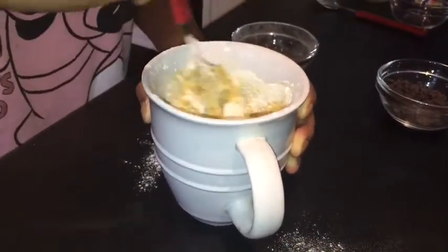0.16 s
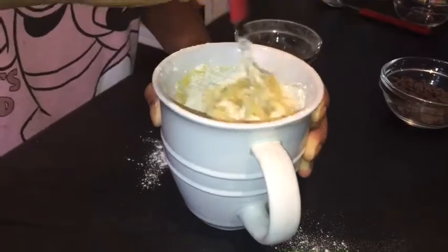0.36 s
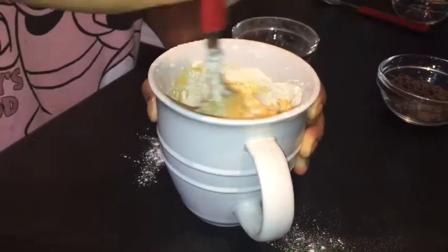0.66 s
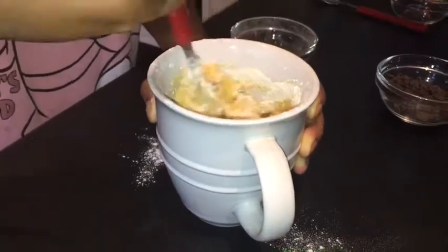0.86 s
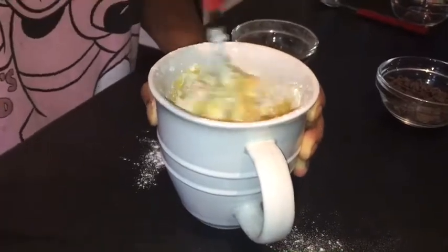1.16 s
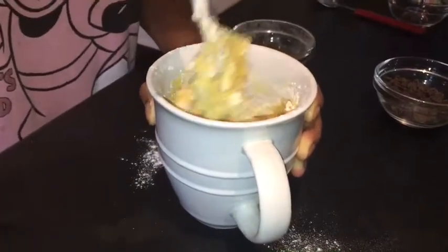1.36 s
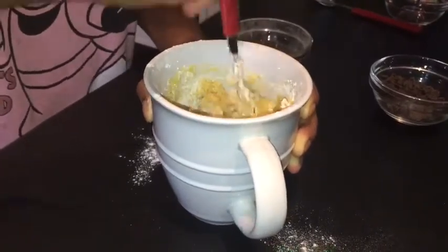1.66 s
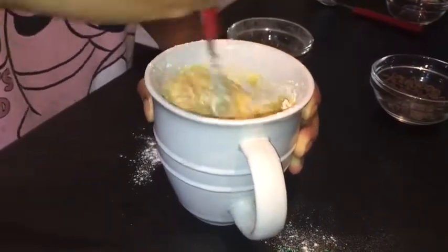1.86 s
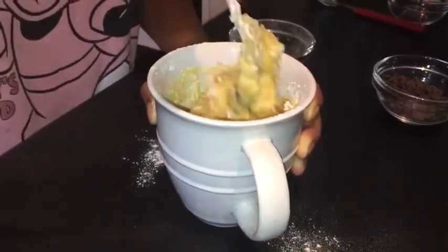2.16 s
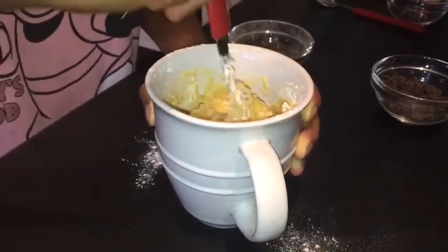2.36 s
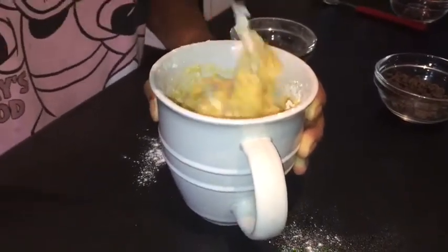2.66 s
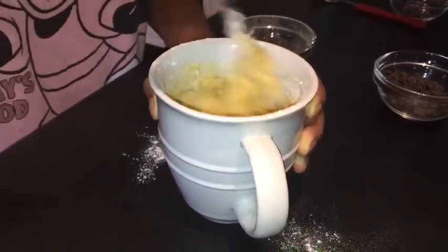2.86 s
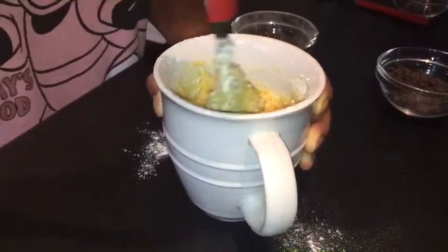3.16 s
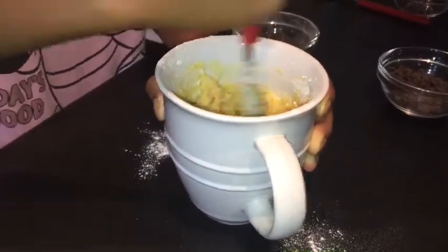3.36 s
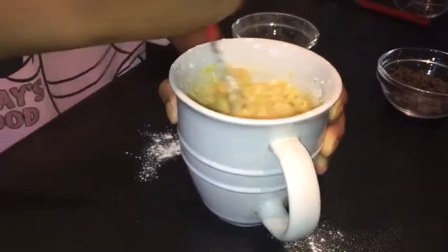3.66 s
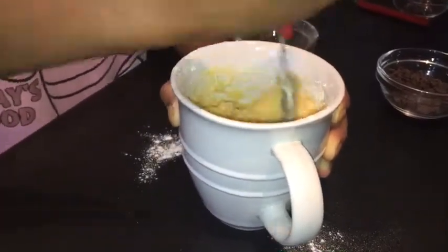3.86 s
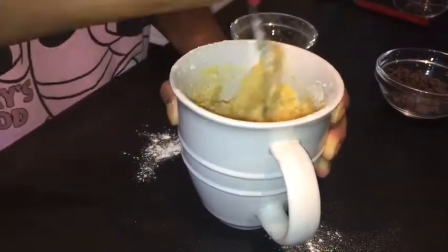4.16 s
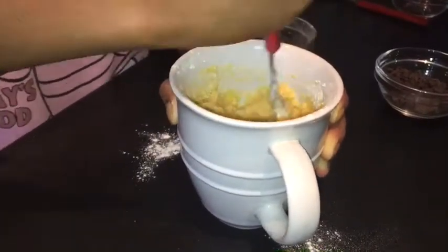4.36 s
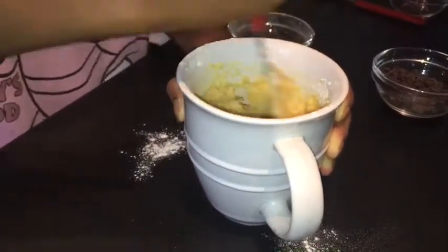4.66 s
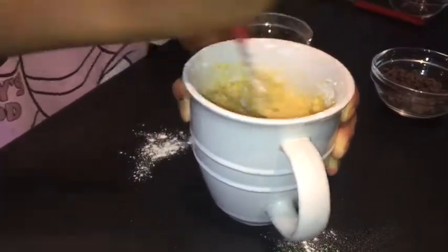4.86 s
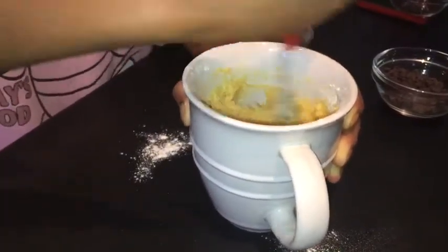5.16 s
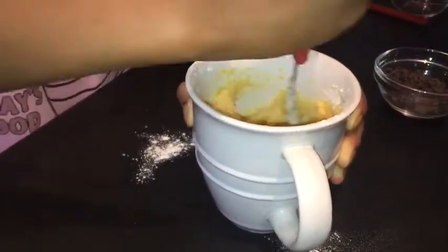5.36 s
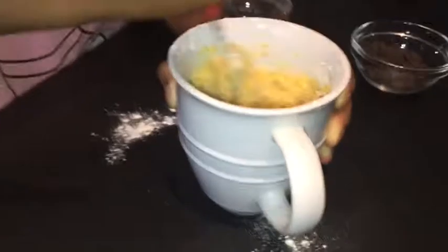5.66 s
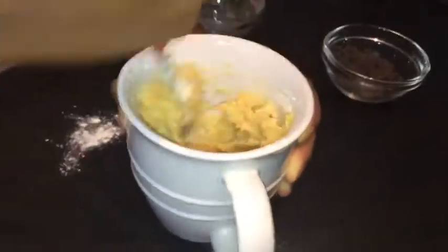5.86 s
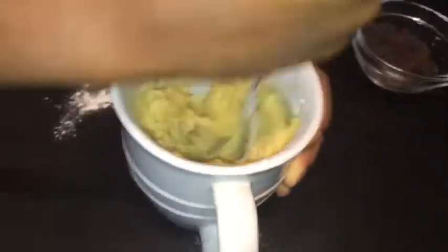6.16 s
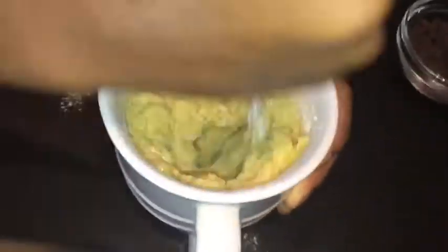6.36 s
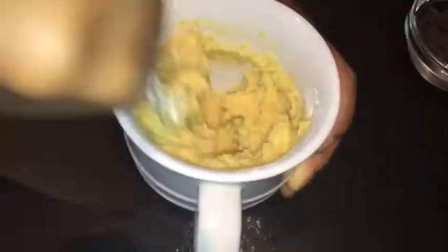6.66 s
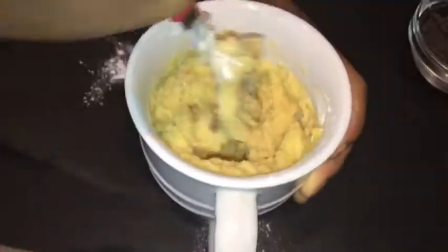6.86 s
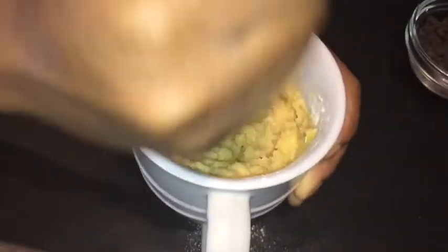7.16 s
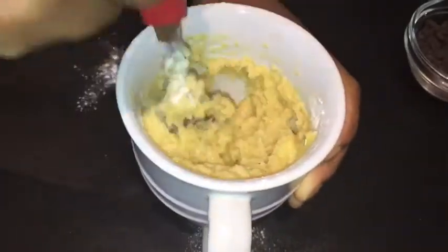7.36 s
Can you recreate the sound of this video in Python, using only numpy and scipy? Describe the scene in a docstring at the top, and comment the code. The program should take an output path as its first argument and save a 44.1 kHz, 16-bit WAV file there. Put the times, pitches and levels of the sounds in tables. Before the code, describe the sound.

Close up in a quiet kitchen, thick dough is mixed in a ceramic mug with a metal spoon. Faint crumbly scrapes and scattered muffled taps come first, then sharper clinks and steadier rubbing along the wall as the mixing gets busier and louder. The mug now and then thumps softly on the counter. The last strokes drop back to light scrapes and ticks.

```python
"""A spoon knocks in a hand-held ceramic mug as it stirs stiff, sticky dough on a kitchen counter.
Each impact excites damped modes of the dough-lined wall, the base, the spoon and the counter.
Stick-slip friction rasps crumbs along the glaze, sticky threads snap, and each push shakes the counter.
A small hard room reverberates the impacts, over a quiet noise floor and a faint passing hum."""
import sys
import numpy as np
from scipy import signal
from scipy.fft import rfft, irfft
from scipy.io import wavfile
from scipy.ndimage import uniform_filter1d

SR = 44100
rng = np.random.default_rng(int(sys.argv[2]) if len(sys.argv) > 2 else 0)


def put_to_file(sound):
    """Save the sound as 16-bit audio at rate SR, in the file named by the first command-line argument."""
    columns = np.atleast_2d(sound).T  # one column per channel
    safe = np.clip(columns, -1, 1)
    whole_steps = np.round(safe * 32767)
    wavfile.write(sys.argv[1], SR, whole_steps.astype(np.int16))


N = 331058
TIME = np.arange(N) / SR


def amp(db):
    return 10 ** (np.asarray(db) / 20)


def unit_rms(x):
    return x / np.sqrt(np.mean(x ** 2) + 1e-20)


def unit_peak_rms(x, window_s):
    return x / np.sqrt(uniform_filter1d(x ** 2, max(round(window_s * SR), 1)).max())


def curve_at(points, hz):
    f, value = np.transpose(points)
    return np.interp(np.log(hz + 1), np.log(f + 1), value)


def add(mix, start_s, sound):
    part = mix[round(start_s * SR):][:len(sound)]
    part += sound[:len(part)]


def colour(x, spectrum):
    """Spectral shaping by a curve in dB, at unit rms."""
    return unit_rms(irfft(rfft(x) * amp(curve_at(spectrum, np.fft.rfftfreq(len(x), 1 / SR))), len(x)))


def band(x, low_hz, high_hz, order=2):
    """Band-pass filtering, at unit rms."""
    return unit_rms(signal.sosfilt(signal.butter(order, [low_hz, high_hz], "band", fs=SR, output="sos"), x))


def flutter(rate_hz):
    """Random modulation: low-passed noise of unit rms."""
    return unit_rms(signal.lfilter(*signal.butter(2, rate_hz, fs=SR), rng.standard_normal(N)))


def resonate(x, hz, width_hz):
    """Resonance of movable frequency by heterodyning: shift down, smooth, shift back."""
    carrier = np.exp(2j * np.pi * np.cumsum(hz * np.ones(len(x))) / SR)
    pole = np.exp(-np.pi * width_hz / SR)
    return 2 * (carrier * signal.lfilter([1 - pole], [1, -pole], x / carrier)).real


def ring(modes, rise_s, chance, scale=1, rough=0, detune=0.018):
    """Modal superposition: damped sines of alternating sign, varied in level and tuning by each blow."""
    t = np.arange(SR // 4) / SR
    out = np.zeros(len(t))
    for k, ((hz, db, t60), draw) in enumerate(zip(modes, chance)):
        envelope = amp(db + 3.7 * draw - 60 * t / t60)
        out += (-1) ** k * envelope * np.sin(2 * np.pi * hz * scale * (1 + detune * draw) * t)
    out = out * (1 - np.exp(-t / rise_s)) * (1 + rough)
    return unit_peak_rms(out, 3 / (modes[0][0] * scale))


# Noise floor spectrum: f/Hz, relative level/dB
AIR_SPECTRUM = [(50, -24), (114, 2), (294, -13), (423, -13.5), (942, -20.5), (5000, -26.5), (9900, -30.5),
                (12500, -27.5), (16600, -18.5)]
def still_air(level_db=-63.5):
    """Stationary broadband noise, strongest in the bass."""
    return amp(level_db) * colour(rng.standard_normal(N), AIR_SPECTRUM)


# Passing hum: start t/s, end t/s, f/Hz, level/dB
HUM_TONE = (1.66, 3.5, 198, -63.5)
def hum():
    """Amplitude modulation: a faint low tone wavers in level."""
    start, end, hz, db = HUM_TONE
    gate = np.clip(20 * np.minimum(TIME - start, end - TIME), 0, 1)
    return amp(db + 2 * flutter(3.4)) * gate * np.sin(2 * np.pi * hz * TIME)


# Room reverberation: f/Hz, T60/s, level/dB
ROOM_BANDS = [(300, .3, -7), (900, .28, -7), (2000, .2, -15), (6000, .15, -17), (14000, .1, -21)]
def reverberation(x):
    """Sparse reflections decay exponentially; absorption by soft surfaces shortens the treble."""
    taps = np.zeros(SR // 2)
    slots = np.arange(60, SR // 2 - 20, 20)
    taps[slots + rng.integers(0, 20, len(slots))] = rng.choice([-1., 1.], len(slots))
    hz, t, spectra = signal.stft(taps, SR, nperseg=256)
    t60 = curve_at([row[:2] for row in ROOM_BANDS], hz)[:, None]
    gain = amp(curve_at([row[::2] for row in ROOM_BANDS], hz))[:, None]
    decay = amp(-60 * t / t60)
    decay *= gain / np.linalg.norm(decay, axis=1)[:, None]
    tail = signal.istft(spectra * decay, SR, nperseg=256)[1] * np.sqrt(20 / 128)
    return signal.oaconvolve(x, tail)[:N]


# The mug rocks against the counter: t/s, level/dB, f/Hz
MUG_BUMPS = [(0.009, -41, 100), (0.118, -56, 177), (0.06, -57, 112), (0.285, -51, 309), (0.812, -55.5, 167),
             (1.066, -54.5, 300), (1.74, -46, 216), (1.985, -48, 73.5), (2.008, -60, 123),
             (3.006, -38, 166), (5.127, -27.5, 157), (5.327, -45.5, 238), (2.546, -48.5, 282),
             (3.343, -42, 300), (3.561, -47, 282), (3.882, -54, 288), (7.359, -43, 166)]
def bumps():
    """A soft, slow contact excites only low modes: the counter's boom and one overtone."""
    out = np.zeros(N)
    for (start, db, hz), chance in zip(MUG_BUMPS, rng.standard_normal((len(MUG_BUMPS), 2))):
        overtone_db = 6 - 20 * max(np.log2(hz / 180), 0)
        modes = [(1.0, 10.3, 0.13), (2.05, overtone_db, 0.034)]
        add(out, start, amp(db) * ring(modes, 0.00046, chance, scale=hz))
    return out


# Strength of the shaking: t/s, level/dB
PUSH_LEVELS = [(0.0, -55.5), (1.54, -64.5), (1.71, -62), (2.92, -54.5), (3.13, -60.5), (3.7, -54.5),
               (4.22, -68), (4.7, -58), (4.99, -47), (5.28, -50), (5.41, -51.5), (5.64, -55), (5.8, -50),
               (6.54, -54), (6.92, -65), (7.5, -57.5)]
# Resonances of the shaken counter: f/Hz, bandwidth/Hz, relative level/dB
SHAKE_MODES = [(130, 20, -46), (176, 44, 7.5), (303, 30, 14.5), (391, 15, 0.5)]
def counter_shake(drag_db, follow=0.65):
    """Forced vibration: uneven pushes drive the counter's resonances, harder on each stroke."""
    shove_db = np.clip(drag_db - uniform_filter1d(drag_db, size=SR // 2), -15, 15)
    level_db = np.interp(TIME, *np.transpose(PUSH_LEVELS)) + follow * shove_db
    force = rng.standard_normal(N) * amp(3.35 * flutter(5.3) + 2 * stick_slip(8.2, 0.01))
    t = np.arange(SR // 8) / SR
    response = sum(amp(db) * np.sqrt(width) * np.exp(-np.pi * width * t) * np.sin(2 * np.pi * hz * t)
                   for hz, width, db in SHAKE_MODES)
    return amp(level_db) * unit_rms(signal.oaconvolve(force, response)[:N])


# Small ticks, from sticky dough snaps and a few light spoon taps on the mug wall: t/s, level/dB, f/Hz
SMALL_TICKS = [(0.2915, -48.5, 8500), (0.4433, -47.5, 8550), (0.642, -44.5, 4570), (0.96, -52, 3100),
               (0.851, -45.5, 4100), (1.065, -49, 8100), (1.076, -39.5, 11200), (1.282, -52.5, 2900),
               (1.7309, -37.5, 5100), (1.8, -45, 12400), (2.064, -44, 12100), (2.4233, -40, 7400),
               (2.429, -36, 7200), (2.4785, -43, 11900), (2.755, -40, 12600), (3.0422, -38.5, 8700),
               (3.0725, -50, 4500), (3.314, -42.5, 7900), (3.433, -42, 3970), (3.462, -42.5, 4000),
               (3.476, -46.5, 3900), (3.495, -53, 3800), (3.628, -44.5, 3180), (3.6564, -43, 4700),
               (4.5174, -48, 4000), (4.82, -38.5, 3770), (4.865, -36.5, 3770), (5.4556, -39, 2120),
               (5.871, -38, 2240), (6.2657, -40.5, 2120), (6.32, -43, 2350), (5.949, -40, 11600),
               (6.196, -46, 9450), (6.394, -41, 9000), (6.575, -26.5, 13000), (6.767, -31, 12000),
               (7.3286, -45, 2730), (7.416, -38.5, 12300)]
def ticks(decay_cycles=2.1):
    """Damped transients of tone and hiss around one pitch; at constant Q, low ones last longer."""
    out, t = np.zeros(N), np.arange(256) / SR
    for start, db, hz in SMALL_TICKS:
        hiss = band(rng.standard_normal(len(t)), hz / 1.5, min(hz * 1.5, 15000), order=1)
        tick = (np.sin(2 * np.pi * hz * t) + 0.77 * hiss) * t * np.exp(-t * hz / decay_cycles)
        add(out, start, amp(db) * unit_peak_rms(tick, 0.0018))
    return out


def stick_slip(per_s, relax_s):
    """Relaxation process: sudden random jumps that ease off, with zero mean and unit rms."""
    jumps = rng.exponential(1, N) * (rng.random(N) < per_s / SR)
    tension = np.log(0.19 + signal.lfilter([1], [1, -np.exp(-1 / SR / relax_s)], jumps))
    return unit_rms(tension - tension.mean())


def crackle(per_s, spread_db, low_hz, high_hz, cycles):
    """Poisson process of damped pops at twelve pitches, most faint, a few strong."""
    impulses = amp(spread_db * np.minimum(rng.exponential(1, N), 3)) * (rng.random(N) < per_s / SR)
    pitch_index = rng.integers(0, 12, N)
    out, t = np.zeros(N), np.arange(256) / SR
    for k, hz in enumerate(np.geomspace(low_hz, high_hz, 12)):
        pop = np.sin(2 * np.pi * hz * t) * t * np.exp(-t * hz / cycles)
        out += signal.oaconvolve(impulses * (pitch_index == k), pop / np.linalg.norm(pop))[:N]
    return unit_rms(out)


def lumps(x, depth_db):
    """Spectral modulation by lumps of dough: random patches some 1500 Hz wide and 25 ms long."""
    spectra = signal.stft(x, nperseg=256, noverlap=192)[2]
    patches = rng.standard_normal(spectra.shape[::-1]).T
    patches = unit_rms(uniform_filter1d(uniform_filter1d(patches, size=9, axis=0), size=18, axis=1))
    return signal.istft(spectra * amp(depth_db * patches), nperseg=256, noverlap=192)[1][:N]


# Crumbs on the glaze: f/Hz, relative level/dB
RASP_SPECTRUM = [(1800, -35), (3000, -2.5), (5300, -8), (8300, -2), (9900, -10), (12300, 2), (14500, -3.5),
                 (16500, -18)]
def crumb_rasp(jerk, graininess):
    """Friction noise: many tiny contacts make hiss and separate pops."""
    hiss = lumps(rng.standard_normal(N) * amp(4.95 * graininess * jerk), depth_db=3)
    pops = crackle(550, 8.1, 5000, 19000, cycles=0.55)
    return colour(hiss + 1.1 * graininess ** 2 * pops, RASP_SPECTRUM)


# Spoon sliding on the wall: f/Hz, relative level/dB
DRAG_SPECTRUM = [(260, -4.5), (700, -4.5), (1100, 0), (2070, -6), (2500, -7.5), (3200, -6), (4500, -11),
                 (6000, -36.5)]
def wall_drag(jerk, graininess):
    """Sliding friction excites a wandering resonance, so the wall sings faintly."""
    rub = lumps(rng.standard_normal(N) * amp(1.64 * graininess * jerk + 3.6 * np.tanh(flutter(21))), 4)
    rub += 0.14 * graininess * crackle(370, 7, 1700, 5000, cycles=2.4)
    singing = resonate(rub, hz=2043 * (1 + 0.022 * flutter(5.5)), width_hz=67)
    return colour(rub + amp(11) * singing, DRAG_SPECTRUM)


# Strokes through the dough: start t/s, duration/s, rasp level/dB, drag level/dB
STIR_STROKES = [(0.048, 0.41, -61.5, -67), (0.215, 0.034, -74, -52), (0.617, 0.19, -61, -72),
                (0.836, 0.0045, -50.5, -63), (0.913, 0.074, -67, -72), (1.058, 0.26, -60.5, -71),
                (1.46, 0.18, -63, -70.5), (1.712, 0.074, -54.5, -65), (1.846, 0.11, -65, -72.5),
                (2.01, 0.048, -57.5, -64), (2.116, 0.12, -70.5, -80.5), (2.249, 0.053, -63, -70.5),
                (2.382, 0.13, -57.5, -66.5), (2.536, 0.13, -59.5, -65.5), (2.709, 0.047, -57.5, -69),
                (2.824, 0.0085, -49.5, -62), (2.902, 0.24, -58.5, -68.5), (3.322, 0.032, -52, -52.5),
                (3.405, 0.073, -48, -60), (3.538, 0.14, -53.5, -54.5), (3.726, 0.11, -64.5, -65.5),
                (3.862, 0.035, -50.5, -61), (4.141, 0.027, -49.5, -63), (4.292, 0.03, -52, -56),
                (4.388, 0.094, -57.5, -60.5), (4.53, 0.87, -53.5, -56.5), (4.726, 0.35, -48.5, -49.5),
                (5.114, 0.011, -43.5, -49), (5.21, 0.009, -38, -45.5), (5.308, 0.0057, -43, -48.5),
                (5.393, .36, -48.5, -49.5), (5.8, 0.0087, -36.5, -46.5), (5.892, 0.13, -48, -49.5),
                (5.996, 0.076, -40, -51), (6.104, 0.13, -41, -53), (6.234, 0.28, -44.5, -51.5),
                (6.528, 0.06, -42.5, -57.5), (6.648, 0.0075, -39.5, -50), (6.746, 0.02, -39.5, -51.5),
                (7.01, 0.19, -61.5, -65.5), (7.3, 0.077, -50.5, -60), (7.413, 0.1, -57, -69)]
def stirring(rise_db_per_s=595, sag_db_per_s=13, fall_db_per_s=336.5):
    """Each stroke bites, tires and lets go; overlapping strokes are incoherent and add in power."""
    t = np.arange(0, N, 64) / SR
    start, length, *levels = np.transpose(STIR_STROKES)[:, :, None]
    age = t - start
    shape_db = (rise_db_per_s * np.minimum(age, 0) - sag_db_per_s * np.clip(age, 0, length)
                - fall_db_per_s * np.maximum(age - length, 0))
    powers = [(amp(db + shape_db) ** 2).sum(0) + 1e-12 for db in levels]
    rasp_db, drag_db = [np.interp(TIME, t, 10 * np.log10(power)) for power in powers]
    jerk = stick_slip(per_s=45, relax_s=0.0072)
    graininess = np.clip(-(rasp_db + 32.5) / 22, 0.5, 1.1)  # slow strokes part single threads
    rasp = amp(rasp_db) * crumb_rasp(jerk, graininess)
    drag = amp(drag_db) * wall_drag(jerk, graininess)
    return rasp + drag + counter_shake(drag_db)


# Modes of the spoon's bowl, edge and stem, each: f/Hz, relative level/dB, T60/s
BOWL_MODES = [(4500, 0, .005), (5400, -5, .004), (3500, -5, .003)]
EDGE_MODES = [(7000, -3, .003), (8800, -2, .004), (11600, -5, .004), (13450, 0, .007)]
STEM_MODES = [(4670, 3, .045), (4793, -2, .16), (4868, -2, .15), (8940, -9, .12), (11420, -6, .09),
              (13530, -5, .12), (13920, -4, .07)]
def spoon_ring(start, wall_db, metal_db, edge_hz, chance, grit, wiped_s=2.5):
    """Free vibration of the spoon: the point of impact favours edge modes near edge_hz."""
    edge_modes = [(hz, db - 20 * abs(np.log2(hz / edge_hz)), t60) for hz, db, t60 in EDGE_MODES]
    bowl_db = metal_db - 2 + 15 * np.log2(edge_hz / EDGE_MODES[-1][0])  # dull spots excite it less
    muting_db = 0.9 * min(bowl_db - wall_db + 15.5, 0) - 0.36 * max(bowl_db + 33.5, 0)
    stem_db = bowl_db - 8 + muting_db - 9 * (start < wiped_s)  # dough mutes the stem until wiped off
    bowl = amp(bowl_db) * ring(BOWL_MODES, 0.000076, 0.5 * chance[0])
    edge = amp(metal_db) * ring(edge_modes, 0.000039, 0.71 * chance[1], detune=0.016)
    stem = amp(stem_db) * ring(STEM_MODES, 0.001, 0.9 * chance[2], rough=0.7 * grit, detune=0.004)
    return bowl + edge + stem


def contact_noise(wall_db, wall_hz, base_db, metal_db, grit, skid_s=0.031, slump_s=0.018):
    """Broadband transients: the contact clacks and cracks, the spoon skids on, the dough slumps."""
    t = np.arange(SR // 8) / SR
    noise = rng.standard_normal(len(t))
    clack = amp(wall_db - 17) * band(noise[::-1], 1300, 4500) * np.exp(-t / 0.0039)
    crack = amp(metal_db - 5) * band(noise, 2800, 12000) * np.exp(-t / 0.0015)
    scrape = unit_rms(band(noise, 1800, 6500) + 1.2 * unit_rms(resonate(noise, 1.2 * wall_hz, 600)))
    skid = amp(wall_db - 24) * scrape * (1 + 0.26 * grit[:len(t)]) * np.exp(-t / skid_s)
    swell = t / slump_s * np.exp(1 - 2 * t / slump_s)
    slump = amp(base_db - 8) * band(noise[::-1], 420, 1600) * swell
    return clack + crack + skid + slump


# Modes of the counter and of the mug's base, each: f/Hz, relative level/dB, T60/s
COUNTER_MODES = [(300.3, -2.5, 0.14), (264, -12, 0.074), (340, -2, 0.047), (396.7, -5.5, 0.05)]
BASE_MODES = [(410.4, -9.5, 0.31), (484, 5, 0.043), (806, 8.5, 0.03), (985, -7, 0.17), (1164, 6, 0.035),
              (1276, -4.5, 0.078), (1535, -11.5, 0.15), (1974, 4.5, 0.044)]
# Modes of the dough-damped wall: frequency ratio, relative level/dB, T60/s
WALL_MODES = [(0.992, -0.5, 0.0077), (1.265, -4, 0.005), (0.86, -6.5, 0.0055), (1.632, 0, 0.004),
              (1.02, -19.5, 0.044)]
# Spoon meets mug: t/s, wall level/dB, wall f/Hz, base level/dB, metal level/dB, edge f/Hz
SPOON_KNOCKS = [(0.7425, -46, 1980, -46.5, -64, 13000), (1.1143, -41.5, 2160, -63, -40, 14400),
                (1.2043, -77, 2780, -56.5, -64, 7980), (1.512, -29, 2250, -42, -37, 14400),
                (1.69, -43, 2240, -57, -48, 13800), (1.7397, -47, 1620, -42.5, -58, 6740),
                (1.942, -57, 2020, -45.5, -75, 12400), (2.2542, -43, 1590, -45, -46, 13900),
                (2.468, -48.5, 1990, -54, -66, 12100), (2.627, -36.5, 2450, -50.5, -39.5, 13200),
                (2.7237, -38.5, 1930, -55, -45, 13900), (2.812, -31, 2840, -46.5, -27.5, 7400),
                (2.801, -49, 1850, -45.5, -70, 12000), (2.848, -50, 2620, -72, -38.5, 13500),
                (2.9044, -46, 2620, -55, -42, 13500), (3.0071, -47.5, 1900, -48.5, -68, 12700),
                (3.2927, -59, 2970, -58, -45.5, 12500), (3.3905, -26, 2018, -48, -25, 12500),
                (3.6029, -43.5, 2220, -59, -49, 13400), (3.671, -60, 2940, -66, -37, 12300),
                (3.7603, -47, 1870, -45, -62, 11900), (3.99, -49.5, 1850, -42.5, -60, 14400),
                (4.1297, -41, 2150, -51.5, -36.5, 13100), (4.279, -17, 1850, -36.5, -3.5, 12500),
                (4.3965, -38.5, 3220, -50.5, -38.5, 14500), (4.4346, -36.5, 1630, -37.5, -47.5, 14100),
                (4.5761, -37, 1910, -33.5, -66, 14200), (4.6172, -24.5, 2040, -52, -26.5, 6700),
                (4.7281, -36, 1490, -60, -39.5, 12400), (4.7651, -30.5, 1840, -33, -40.5, 8060),
                (4.9357, -26.5, 1533, -32.5, -55, 6960), (5.013, -21.5, 1933, -50, -28, 6630),
                (5.0946, -35.5, 2120, -50, -33, 11600), (5.1991, -21.5, 2380, -57, -23.5, 12800),
                (5.2832, -35.5, 2660, -45, -47, 11600), (5.3574, -41, 1840, -40.5, -59, 7300),
                (5.3899, -44, 1924, -44, -49, 13500), (5.4825, -34, 1980, -57, -42, 6900),
                (5.585, -19.5, 2010, -47.5, -25, 6800), (5.685, -39.5, 1560, -44.5, -42, 7040),
                (5.7739, -26.5, 1820, -36, -52, 7300), (5.7789, -29.5, 1480, -47, -18.5, 6600),
                (5.976, -15.5, 1825, -62, -12.5, 8600), (6.06, -31, 2430, -46, -38.5, 11600),
                (6.1751, -20.5, 1983, -49, -31.5, 6900), (6.3643, -17.5, 1910, -49, -26, 6660),
                (6.459, -36, 1800, -64, -54, 6900), (6.55, -15, 2070, -58, -21.5, 7900),
                (6.6432, -33.5, 1880, -56, -58, 11400), (6.708, -32.5, 1780, -41.5, -85, 12600),
                (6.7299, -31.5, 1750, -57, -42, 12900), (6.8696, -40, 1845, -39.5, -78, 6640),
                (7.1488, -45.5, 2260, -49.5, -49, 8100), (7.294, -43.5, 2540, -87, -63, 6840)]
def knocks(counter_lag_s=0.00251):
    """Impact excitation: light parts ring at once, the heavy counter swells milliseconds later."""
    out = np.zeros(N)
    chances = rng.standard_normal((len(SPOON_KNOCKS), 6, len(BASE_MODES)))
    roughness = flutter(330)  # dough in the contact roughens the ringing
    for (start, wall_db, wall_hz, base_db, metal_db, edge_hz), chance in zip(SPOON_KNOCKS, chances):
        grit = np.resize(roughness[round(start * SR):], SR // 4)
        wall = ring(WALL_MODES, 0.00068, chance[0], scale=wall_hz, rough=0.91 * grit)
        boom = ring(COUNTER_MODES, 0.0036, 1.09 * chance[1], scale=0.96, rough=0.36 * grit, detune=0.036)
        base = ring(BASE_MODES, 0.0009, chance[2], rough=0.55 * grit, detune=0.012)
        add(out, start, amp(wall_db) * wall + amp(base_db - 1) * base)
        add(out, start + counter_lag_s, amp(base_db - 3) * boom)
        add(out, start, spoon_ring(start, wall_db, metal_db, edge_hz, chance[3:], grit))
        add(out, start, contact_noise(wall_db, wall_hz, base_db, metal_db, grit))
    return out


def scene():
    """Superposition of impacts, their reverberation, the stirring and the background."""
    radiation = signal.butter(2, 105, "high", fs=SR, output="sos")  # small bodies radiate no deep bass
    impacts = knocks() + ticks() + bumps()
    air = still_air()
    foreground = signal.sosfilt(radiation, impacts + reverberation(impacts) + stirring())
    return (foreground + air + hum())[None]


def record(dry):
    """Soft limiting rounds the loudest knocks; filters remove deep bass and top treble."""
    rounded = 0.8 * np.tanh(dry / 0.8)
    thinned = signal.sosfilt(signal.butter(2, 55, "high", fs=SR, output="sos"), rounded)
    low_pass = signal.firwin(255, 15950, window=("kaiser", 9), fs=SR)
    return signal.oaconvolve(thinned, low_pass[None], "same")


dry = scene()
out = record(dry)
put_to_file(out)
```